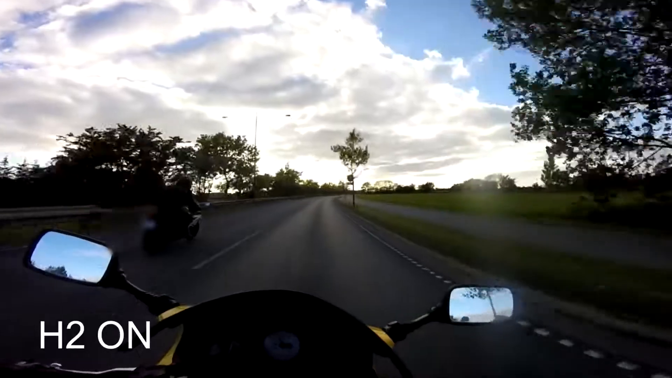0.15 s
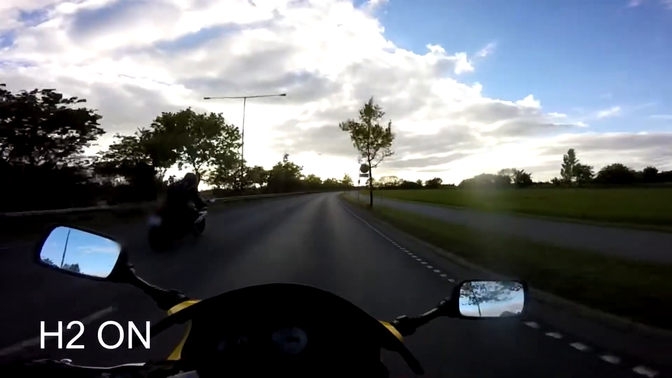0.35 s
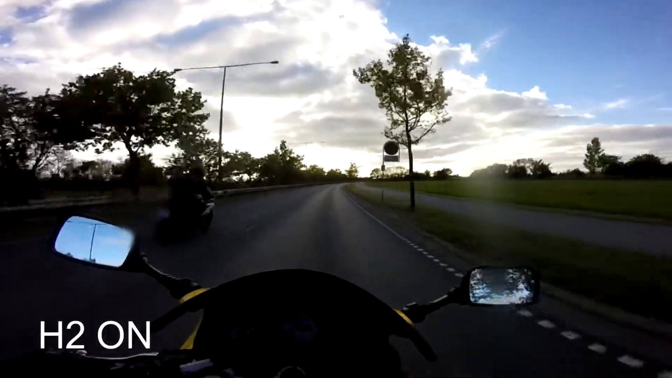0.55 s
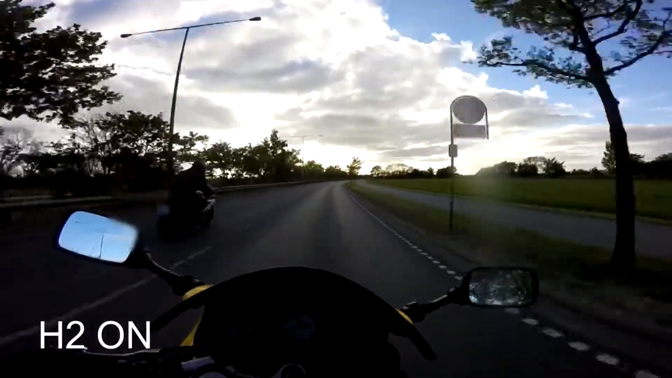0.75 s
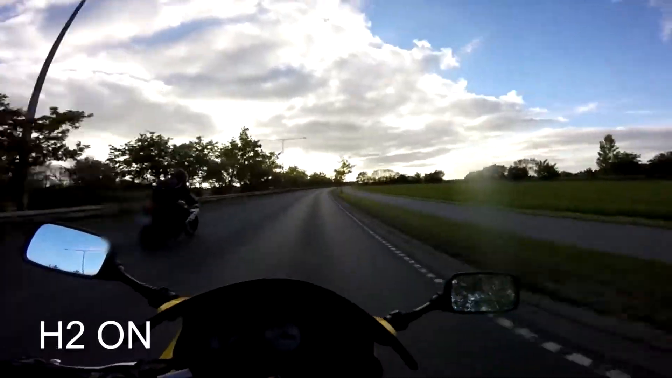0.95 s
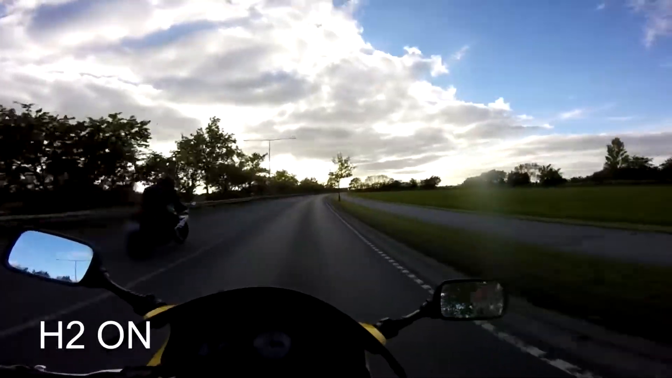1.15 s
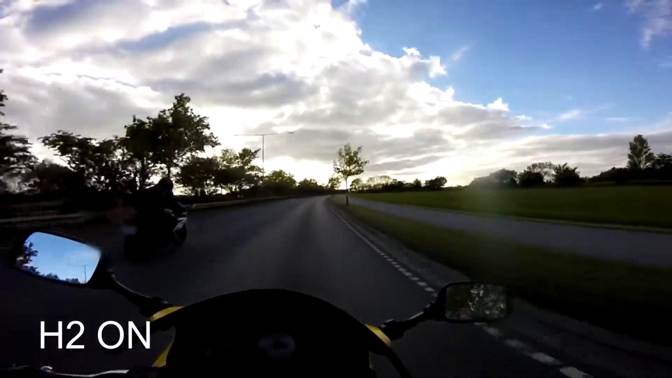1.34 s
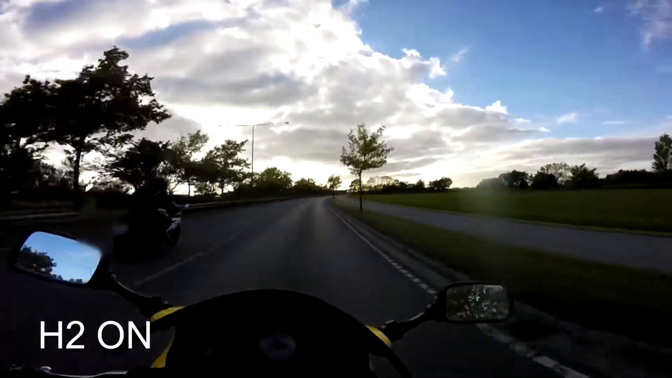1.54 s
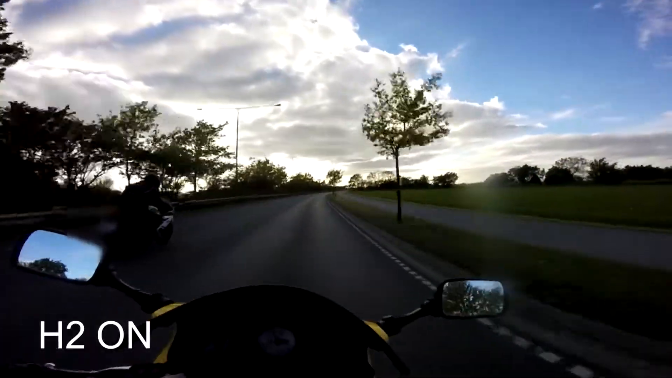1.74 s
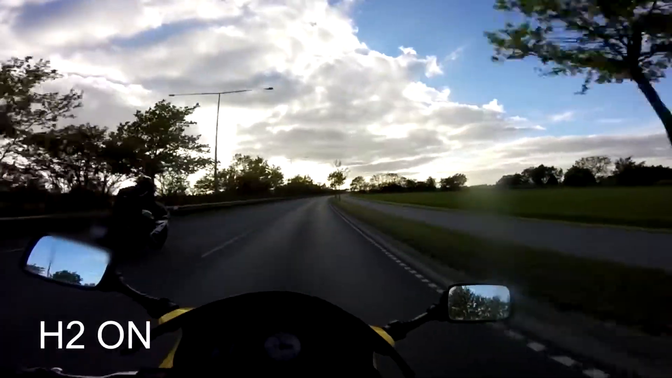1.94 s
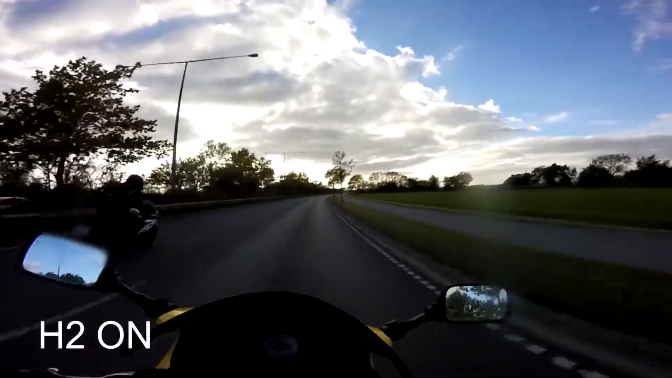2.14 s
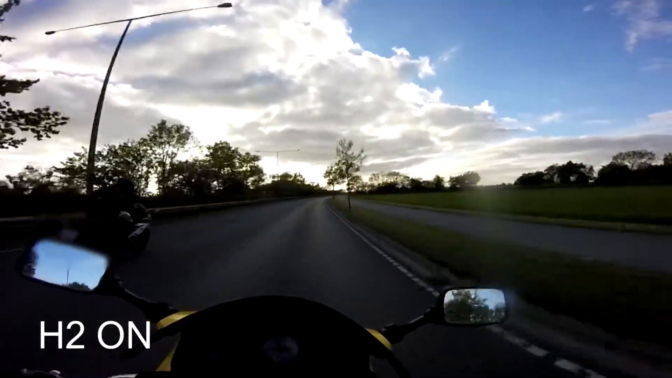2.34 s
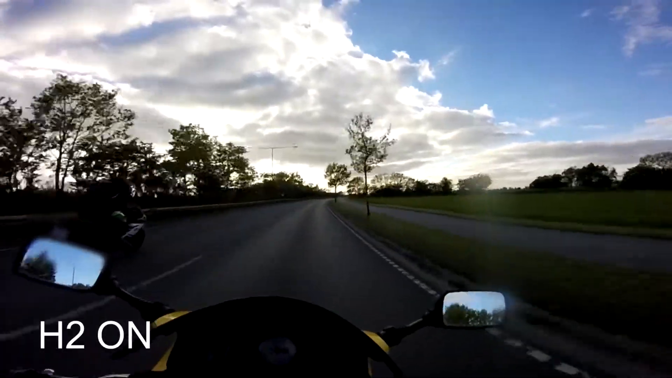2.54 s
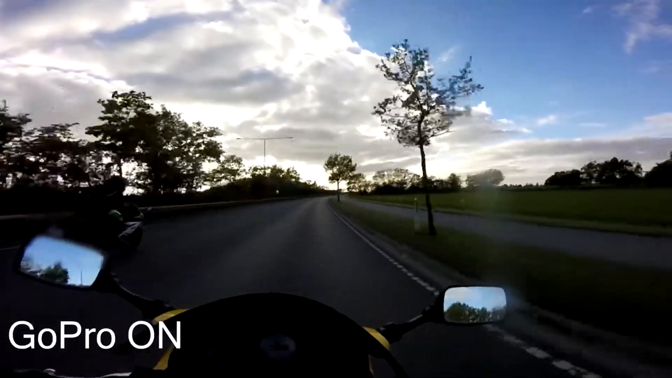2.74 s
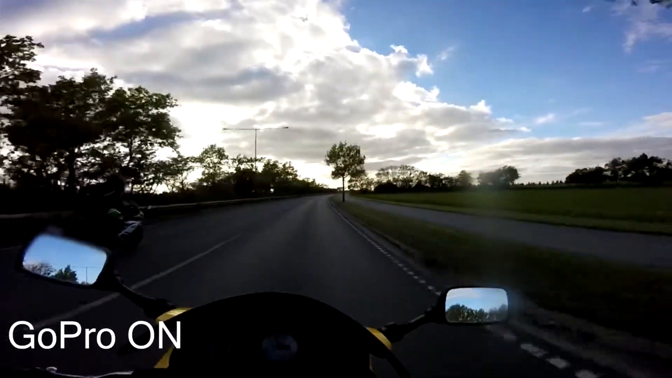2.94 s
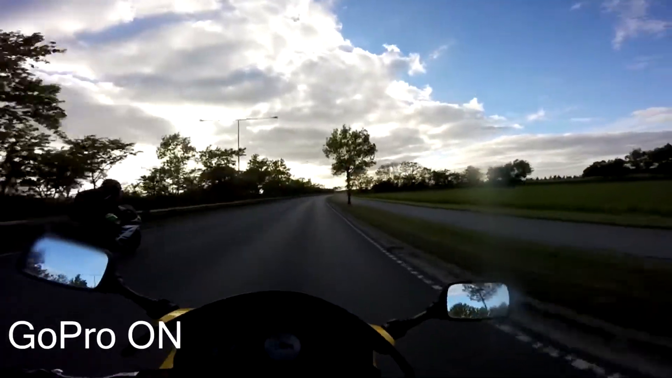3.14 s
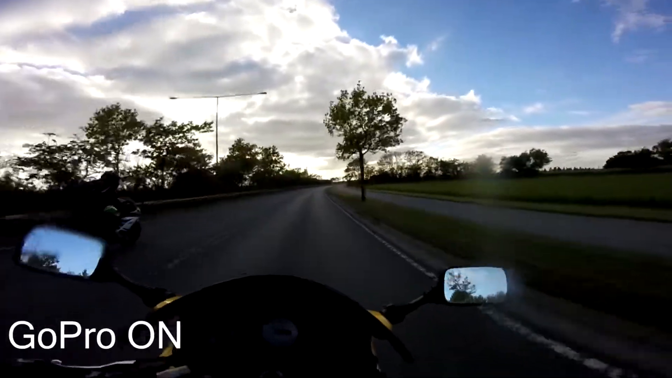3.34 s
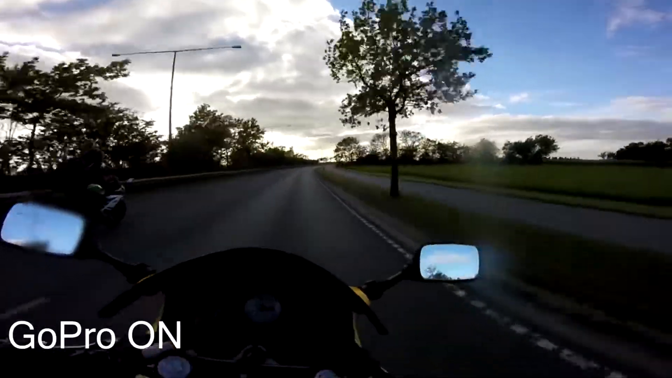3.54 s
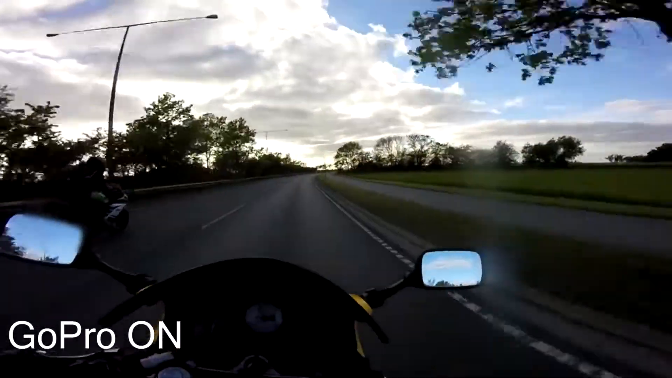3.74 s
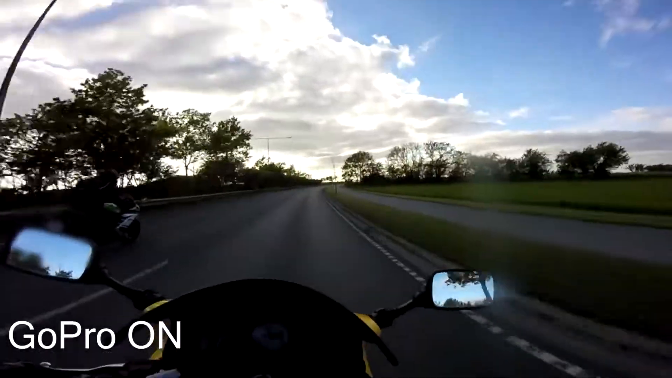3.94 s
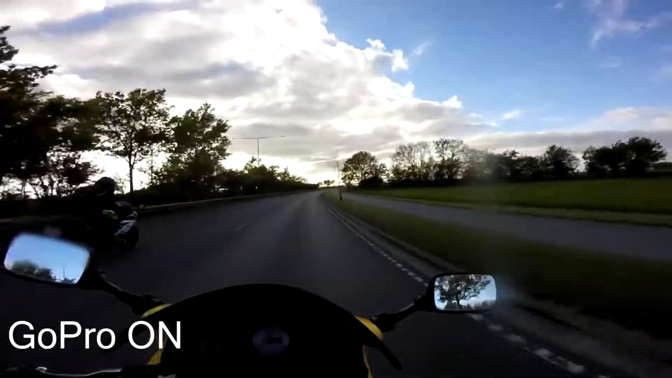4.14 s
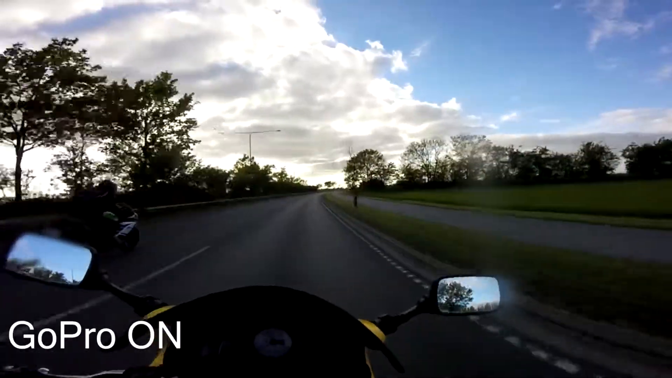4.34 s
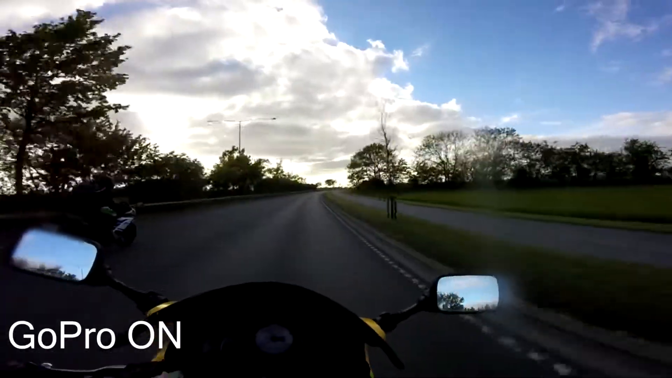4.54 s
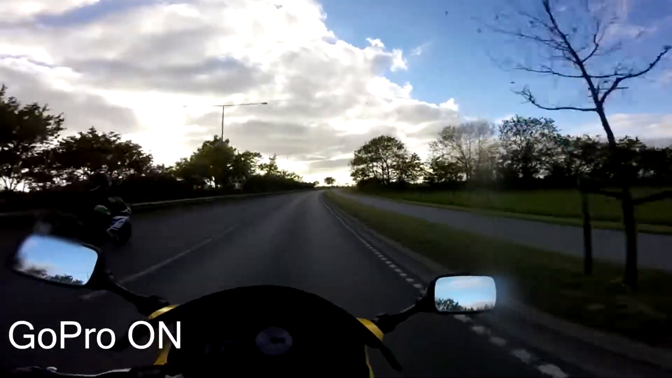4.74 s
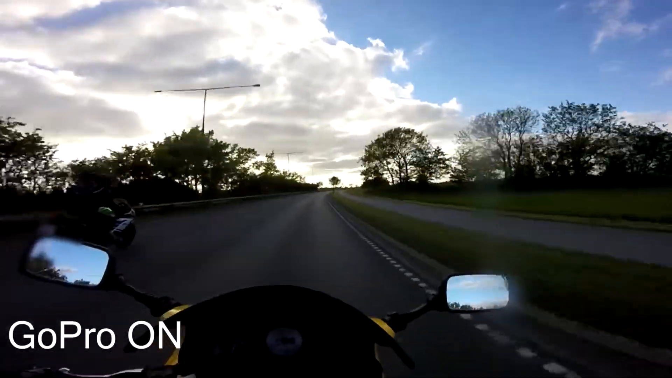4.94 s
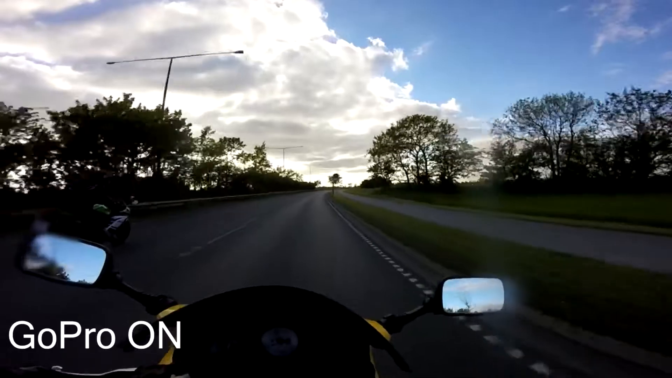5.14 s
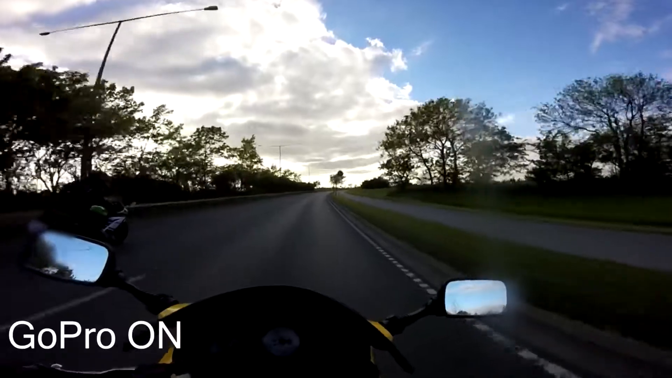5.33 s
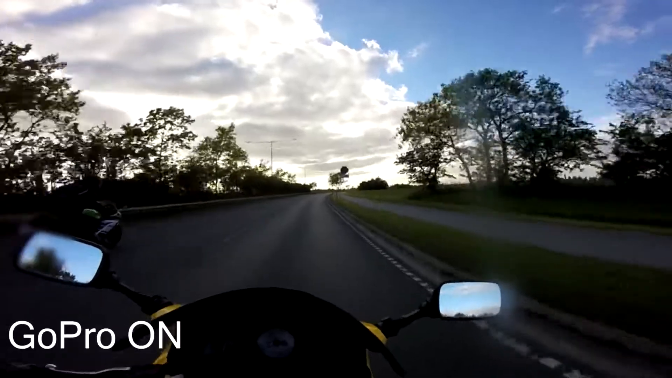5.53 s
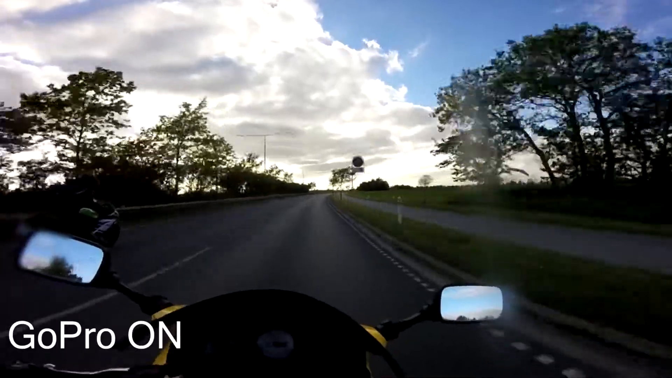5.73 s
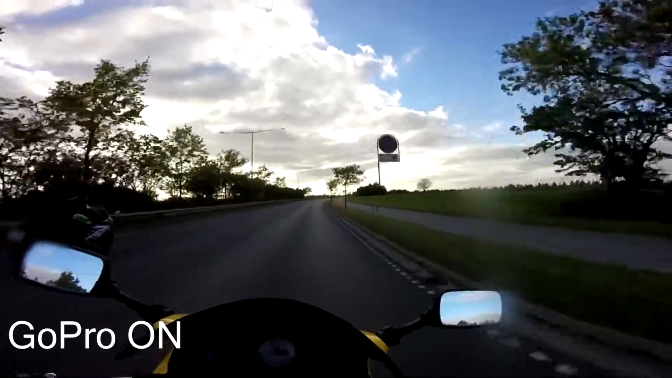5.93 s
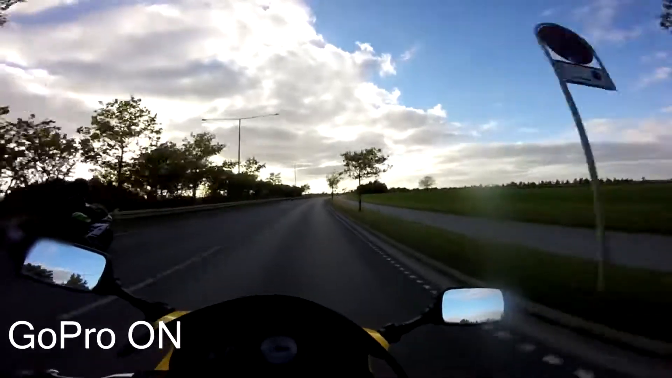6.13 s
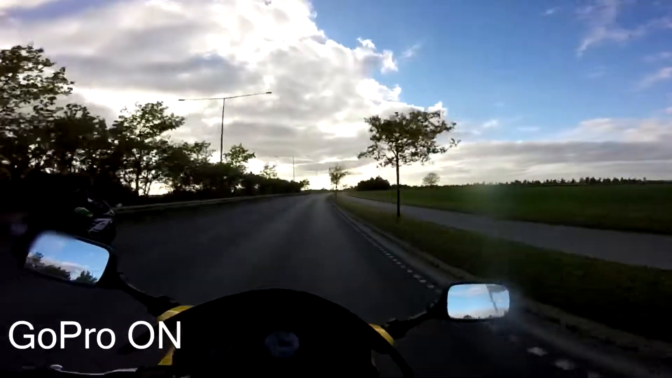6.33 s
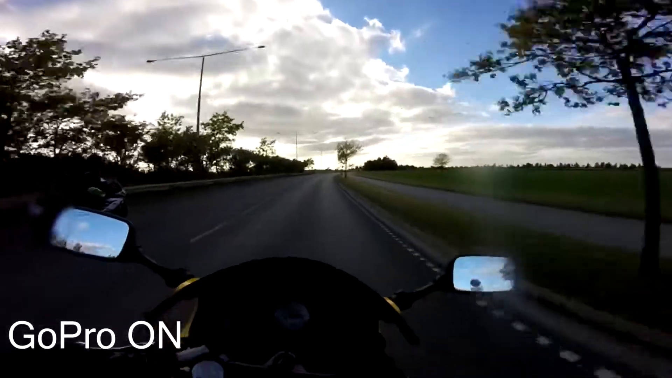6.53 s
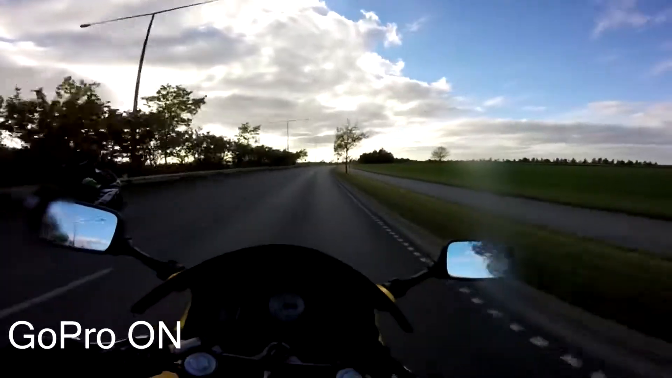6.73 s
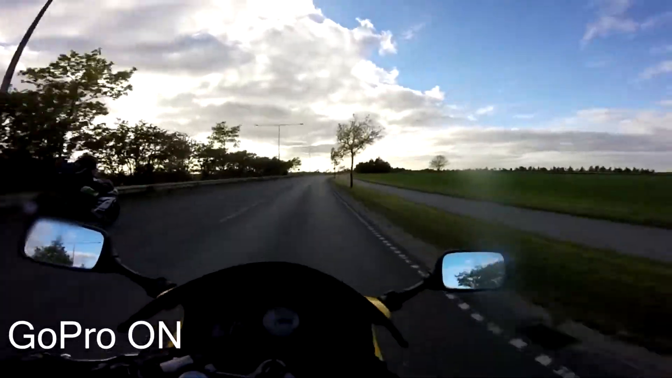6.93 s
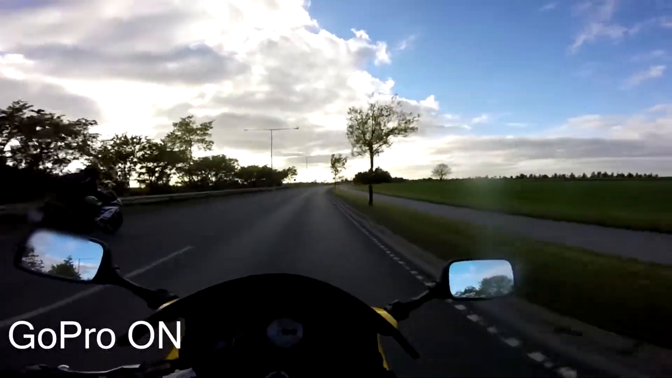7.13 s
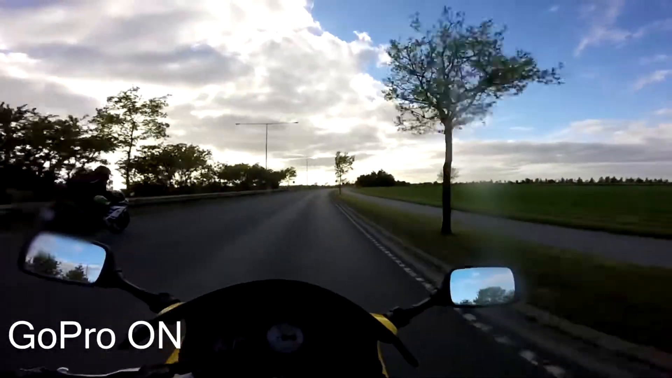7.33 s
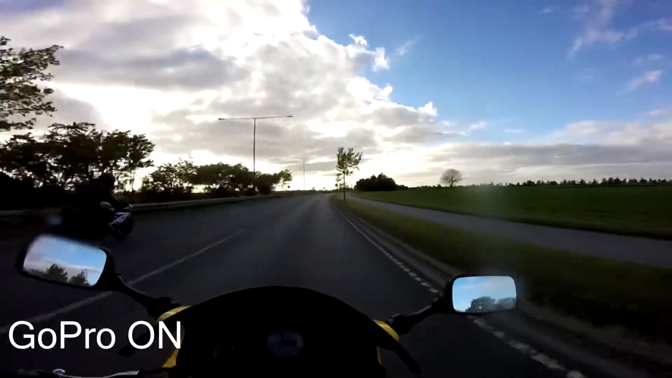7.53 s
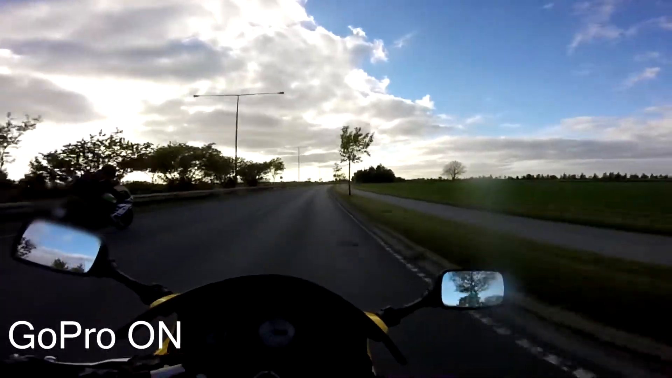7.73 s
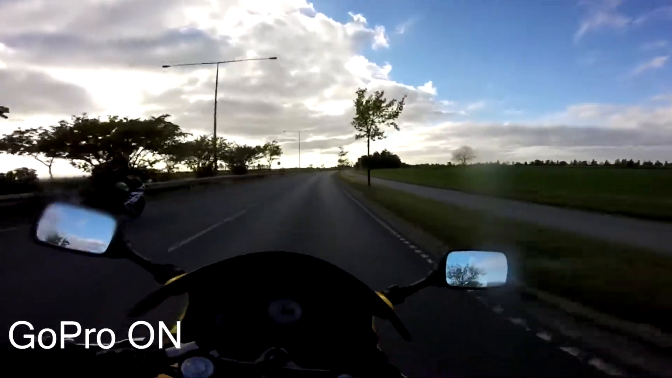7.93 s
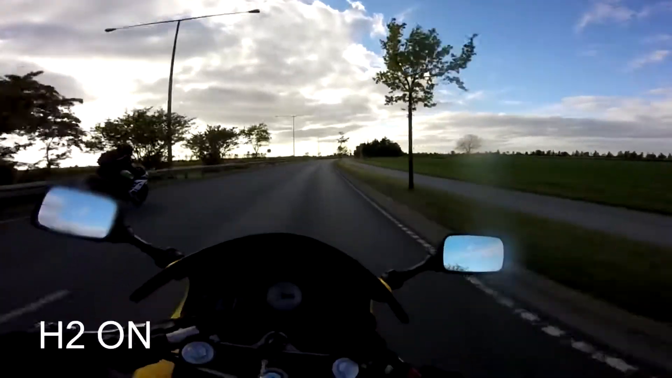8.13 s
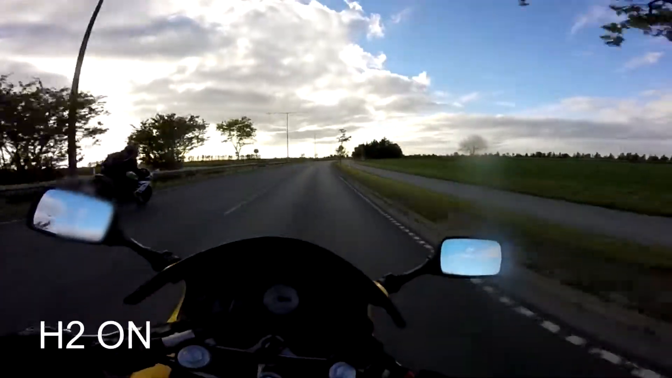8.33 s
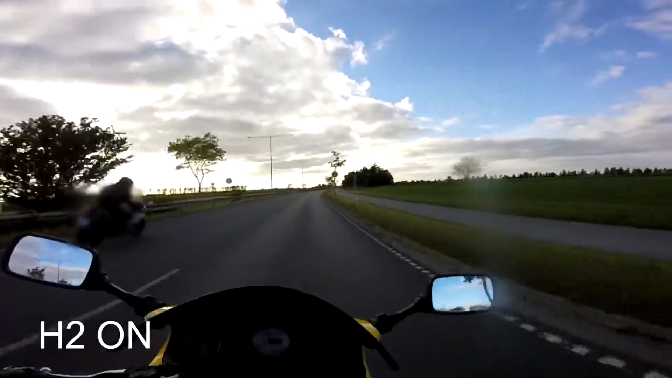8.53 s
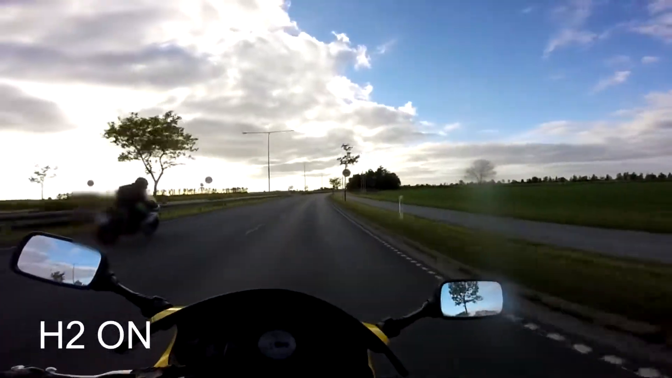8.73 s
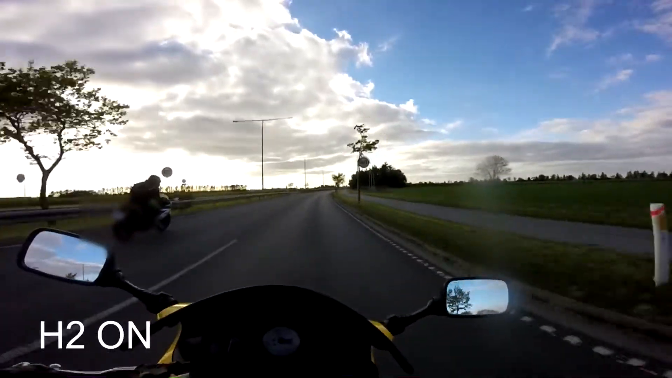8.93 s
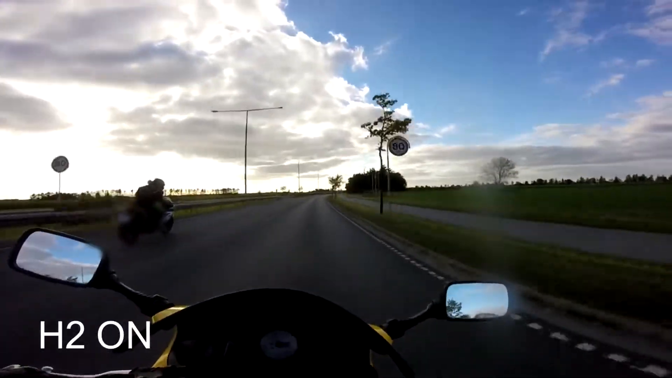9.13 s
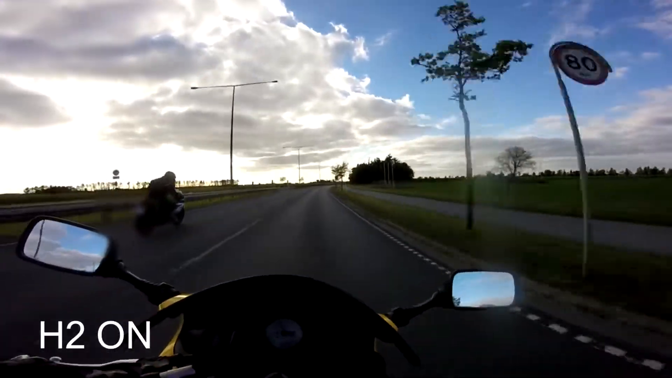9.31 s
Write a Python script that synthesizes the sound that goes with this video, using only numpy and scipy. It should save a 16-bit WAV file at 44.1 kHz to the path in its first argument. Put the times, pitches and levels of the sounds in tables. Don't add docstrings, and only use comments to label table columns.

```python
import sys
import numpy as np
from scipy import signal
from scipy.fft import rfft, irfft, next_fast_len
from scipy.io import wavfile
from scipy.ndimage import uniform_filter1d

SR = 44100
rng = np.random.default_rng(int(sys.argv[2]) if len(sys.argv) > 2 else 0)


def store_wav(level_fs):
    pcm = np.round(np.clip(np.atleast_2d(level_fs), -1, 1) * 32767)
    wavfile.write(sys.argv[1], SR, pcm.T.astype(np.int16))


def undo_db(level):
    steps = np.asarray(level, float) / 20
    return 10 ** steps


N = 417627
TIME = np.arange(N) / SR
SIZE = next_fast_len(N)
FREQ = np.arange(SIZE // 2 + 1) * SR / SIZE + 1e-3

# time in seconds, signed peak re full scale, width in ms,
# gain duck in dB.
BUFFETS = [(2.734, -0.81, 2.3, 7), (2.892, 0.43, 1.5, 4), (2.965, -0.64, 1.6, 6), (3.105, -1.2, 1.8, 14.5),
           (3.265, 1, 1.6, 8.5), (3.426, 0.65, 0.96, 6.6), (3.544, 1, 1.66, 13.5), (3.702, -0.87, 1.7, 7.9),
           (4.095, 0.96, 2.7, 13.5), (4.225, -0.67, 1.8, 11.5), (4.447, -0.5, 1.4, 5.5),
           (4.518, -1.2, 1.4, 10), (4.64, -0.85, 1.6, 12.5), (4.833, -0.9, 0.69, 8.5), (4.963, 0.73, 1, 9),
           (5.141, -0.95, 1.36, 7), (5.695, 0.81, 1.75, 1.7), (5.793, -1.1, 1.4, 5),
           (6.107, -0.73, 1.8, 2.8), (6.252, 0.91, 1.2, 4.5), (6.311, 0.6, 3.48, 9),
           (6.474, -0.91, 1.5, 11), (6.595, -0.68, 1.4, 8.5), (6.648, 0.94, 1.6, 12),
           (6.895, 0.64, 1.5, 11), (7.159, 0.75, 1.5, 4.5), (7.344, 1, 1.75, 8), (7.532, 0.55, 1.4, 4.5),
           (7.765, -0.81, 1.05, 8), (7.986, 0.74, 2.17, 3.5)]


def level(x, db):
    return x * undo_db(db) / np.sqrt(np.mean(x ** 2))


def curves(*tables):
    s, *columns = np.transpose(np.concatenate(tables))
    return [np.interp(TIME, s, column) for column in columns]


def walk(rate):
    hold = int(SR / rate)
    steps = np.repeat(rng.standard_normal(N // 100), hold)[:N]
    return uniform_filter1d(uniform_filter1d(steps, hold), hold)


def bumps(events, width_s):
    coarse = TIME[::64]
    total = sum(db * np.exp(-((coarse - s) / width_s) ** 2 / 2) for s, db in events)
    return total.repeat(64)[:N]


def noise(shape, shared_db, own_db, rate):
    hz, db = np.transpose(shape)
    colour = undo_db(np.interp(np.log(FREQ), np.log(hz), db, left=-80))
    spectrum = rfft(rng.standard_normal(SIZE)) * colour
    octave = np.log2(np.maximum(FREQ, 32) / 32)
    swell = walk(rate)
    total = 0
    for k in range(10):
        band = np.cos(np.pi / 2 * np.clip(octave - k, -1, 1)) ** 2
        gain = undo_db(shared_db * swell + own_db * walk(rate))
        total = total + gain * irfft(spectrum * band, SIZE)[:N]
    return level(total, 0)


def shaped(x, shape):
    hz, db = np.transpose(shape)
    log_gain = np.log(undo_db(np.interp(np.log(FREQ), np.log(hz), db)))
    cepstrum = irfft(log_gain, SIZE)
    cepstrum[1:SIZE // 2] *= 2
    cepstrum[SIZE // 2 + 1:] = 0
    response = np.exp(rfft(cepstrum))
    return level(irfft(rfft(x, SIZE) * response, SIZE)[:N], 0)


def road_noise():
    # frequency in Hz, level in dB per Hz.
    road_colour = [(200, -16), (500, -9.5), (1000, -17), (2000, -22.5), (3600, -31), (4200, -33),
                   (5800, -36), (7000, -42.5), (10000, -46.5), (16000, -62.5)]
    separate = np.array([noise(road_colour, 1.2, 1.4, 3.9) for _ in range(2)])
    shared = noise(road_colour, 1.5, 1.3, 2.8)
    return undo_db(-33.5) * (separate + 0.67 * shared)


def rustle():
    # frequency in Hz, level in dB per Hz.
    rustle_colour = [(3000, -16.5), (7000, -2), (10000, -1), (14000, 1), (14800, 3.5), (16000, -3.5)]
    # time in seconds, peak in dB.
    grit_ticks = [(0.329, -54), (1.2607, -45.5), (1.3594, -50.5), (1.3992, -51.5), (1.469, -47),
                  (1.499, -46.5), (1.7088, -49.5), (1.8786, -46.5), (8.6194, -53.5), (9.3094, -47)]
    rub = undo_db(-59) * np.array([noise(rustle_colour, 2.5, 1.5, 60) for _ in range(2)])
    for s, db in grit_ticks:
        rub = rub * (1 + undo_db(db + 54) * np.exp(-np.abs(TIME - s) / .003))
    return rub


def port_wind():
    # time in seconds, left in dB, right in dB.
    gusts = [
        [(0.0, -4, -3.5), (2.64, -6.5, -3)],
        [(8.16, -5.5, -6.5), (9.47, -5, -2.5)],
    ]
    # frequency in Hz, level in dB per Hz.
    port_colour = [(8, -14.5), (30, -4), (70, 5), (130, -6.5), (250, -16.5), (500, -29), (1000, -32),
                   (2500, -50.5), (16000, -110)]
    return np.array([undo_db(db) * noise(port_colour, 1.1, 1.8, 14) for db in curves(*gusts)])


def helmet_gain():
    # time in seconds, level of the steady hiss in dB.
    rest_gain = [(2.66, -45.5), (3.08, -37.5), (3.5, -44), (3.93, -47), (4.3, -41.5), (4.5, -41.5),
                 (4.82, -45.5), (4.95, -43.5), (5.13, -45.5), (5.45, -50.5), (5.75, -47.5), (6.04, -50),
                 (6.42, -39.5), (6.82, -48.5), (7.14, -43), (7.35, -46), (7.72, -44.5), (8.15, -47.5)]
    recover_s, duck_s = 0.17, 0.01
    s, _, _, duck_db = np.transpose(BUFFETS)
    last = np.maximum(np.searchsorted(s, TIME) - 1, 0)
    below_db = duck_db[last] * np.exp(-np.abs(TIME - s[last]) / recover_s) * (TIME > s[0])
    flutter_db = .7 * walk(45)
    return curves(rest_gain)[0] - uniform_filter1d(below_db, int(duck_s * SR)) + flutter_db


def helmet_wind(gain_db):
    # frequency in Hz, level in dB per Hz.
    helmet_colour = [(12, -35), (25, -3.5), (50, -2), (90, 0), (250, -6), (400, -12), (620, -17),
                     (900, -27.5), (1250, -40), (2500, -46.5), (16000, -120)]
    # time in seconds, rise in dB.
    flurries = [(2.82, 1.5), (2.893, 3.5), (2.975, 5), (3.263, 2), (3.42, 6), (3.496, 6.5), (3.6, 8.5),
                (3.87, 3), (4.09, 6), (4.364, 3.5), (4.62, 8.5), (4.75, 6), (4.819, 7.5), (4.971, 3),
                (5.14, 0), (5.272, 7.5), (5.518, 5), (5.683, 6), (5.935, 8.5), (6.107, 0), (6.585, 11),
                (6.701, 12), (6.83, 6.5), (6.972, 6), (7.174, 5.5), (7.345, 8.5), (7.575, 3), (7.77, 8.5),
                (7.95, 6.5), (8.125, 12)]
    # time in seconds, dip in dB.
    lulls = [(2.86, 5), (3.135, 18), (3.295, 10), (3.568, 7), (3.66, 9), (3.76, 5), (4.195, 12), (4.27, 14),
             (4.315, 14), (4.56, 10), (4.72, 6), (4.86, 15), (4.905, 8), (5.19, 7), (5.39, -1), (5.58, 1),
             (5.72, 4), (6.34, 10), (6.5, 6), (6.92, 9), (7.12, 2), (7.4, 3), (7.45, -3.5), (8.005, 4)]
    # swing from the usual -47 dB gain, flurry, lull
    large_follows, small_follows = (0.19, 0.31, 0.73), (0.48, 0.69, 0.38)
    moves = np.array([gain_db + 47, bumps(flurries, 0.021), -bumps(lulls, 0.013)])
    large_db = -14 + np.dot(large_follows, moves)
    small_db = -25.5 + np.dot(small_follows, moves)
    lumps_db = 3 * walk(160)

    air = noise(helmet_colour, 2.4, 1.2, 90)
    large = signal.sosfiltfilt(signal.butter(2, 330, fs=SR, output="sos"), air)
    small = air - large
    return undo_db(large_db) * level(large, -1.57) + undo_db(small_db + lumps_db) * level(small, -1.23)


def add_buffets(wind):
    for s, peak, ms, _ in BUFFETS:
        near = slice(int((s - .015) * SR), int((s + 0.022) * SR))
        u = (TIME[near] - s) / (ms * 0.00056)
        bump = np.exp(-u ** 2 / 2)
        rebound = 0.091 * np.exp(-u ** 2 / 30)
        wind[near] = wind[near] * (1 - bump) + peak * (1.16 * bump - rebound)
    return wind


def housing_hiss(puff):
    # frequency in Hz, level in dB per Hz.
    housing_colour = [(800, -3.5), (1800, 8.5), (2300, 0), (2700, -7), (3600, 1), (4050, -9.5), (4600, -4),
                      (6400, -4), (7100, -10.5), (8000, -7), (9300, -16), (13000, -24), (14900, -43),
                      (15100, -75)]
    whistle_hz, whistle_db, whistle_at_s, whistle_s = 5830, -14, 7.82, .3
    hiss = undo_db(2.5) * noise(housing_colour, .6, .6, 10) * (1 + .7 * puff)
    swell = undo_db(whistle_db + 4 * walk(25)) * np.exp(-((TIME - whistle_at_s) / whistle_s) ** 4)
    return hiss + swell * np.sin(2 * np.pi * whistle_hz * TIME + 1.5 * walk(40))


def exhaust_cracks():
    # time in seconds, crack rate in Hz.
    crack_rate = [(0.0, 67.59), (0.75, 67.87), (1.45, 67.31), (1.99, 67.76), (2.45, 68.3), (2.99, 68.59),
                  (3.49, 68.96), (3.78, 68.86), (4.3, 68.04), (4.88, 68.43), (5.23, 68.3), (5.75, 67.92),
                  (6.23, 68.23), (7.48, 69.03), (8.22, 70.02), (8.5, 70.19), (9.0, 70.12), (9.47, 70.45)]
    # time in seconds, round trip in ms.
    pipe_trip = [(0, 3.09), (1.05, 3.08), (1.5, 3.15), (2.1, 3.14), (2.8, 3.01), (3.75, 3.0), (4.25, 3.07),
                 (4.75, 3.01), (5.6, 3.09), (6.6, 3.09), (7.1, 3.04), (8.0, 2.98), (9.47, 3.0)]
    pipe_echo_db = [-3, -12, -15]
    turns = np.cumsum(curves(crack_rate)[0]) / SR
    time_chance, level_chance = rng.standard_normal((N // 100, 2))[:int(turns[-1]) - 1].T
    at = np.interp(np.arange(len(time_chance)) + .74, turns, TIME) + 1.5e-5 * time_chance
    trip_s = np.interp(at, *np.transpose(pipe_trip)) / 1000
    cracks = np.zeros(N + SR)
    for k, db in enumerate([0, *pipe_echo_db]):
        place = (at + k * trip_s) * SR
        size = undo_db(db + 1.2 * level_chance)
        whole = place.astype(int)
        np.add.at(cracks, whole, size * (whole + 1 - place))
        np.add.at(cracks, whole + 1, size * (place - whole))
    return cracks[:N]


def neighbour():
    # frequency in Hz, level in dB.
    near_colour = [(200, -5), (270, 25), (340, 22), (430, 4.5), (650, 6), (900, 4.5), (1100, -9.5),
                   (1330, 4.5), (1630, 3), (1950, -2), (2400, -13), (3000, -19.5), (3550, -11.5),
                   (3900, -26.5), (8000, -50)]
    # frequency in Hz, level in dB.
    far_colour = [(250, -19), (340, 9), (700, 3.5), (1100, -28), (1350, -1.5), (1650, -1), (1980, 0),
                  (2300, -8), (2600, -22), (3000, -18), (3550, -24.5), (4200, -22), (8000, -47)]
    # time in seconds, rasp in dB, extra deep ring in dB (heard from
    nearness = [(0, -1, 0.5), (.8, 1, -0.5), (1.2, -3, 0.5), (1.7, 1.5, 1.5), (2.2, 2, 3), (2.6, 1.5, 4.5),
                (3.1, 2.5, -1), (3.6, 0, 0.5), (4.2, -3, 1), (4.7, 0.5, 2), (5.3, -2, -2), (5.8, 1.5, -1),
                (6.3, 3, -2.5), (6.7, 1.5, -6), (7.2, 5, -6), (7.9, 3, -5.5), (8.5, 1.5, -6), (9.47, 0, -7)]
    rasp_db, deep_db = curves(nearness)
    cracks = exhaust_cracks()
    puff = uniform_filter1d(cracks, 60)
    heard = np.array([shaped(cracks, colour) for colour in (near_colour, far_colour)])
    hum = signal.sosfiltfilt(signal.butter(2, 500, fs=SR, output="sos"), heard)
    deep_band = signal.butter(2, (1150, 1490), "bandpass", fs=SR, output="sos")
    deep = signal.sosfiltfilt(deep_band, heard)
    rasp = heard - hum + (undo_db(deep_db) - 1) * deep
    near, far = hum + undo_db(rasp_db) * rasp
    return near, far, puff / puff.max()


def engine():
    # time in seconds, cycle rate in Hz, level in dB.
    engine_run = [
        [(0.0, 44.3, -9), (0.47, 44.6, -8.5), (1.88, 45.3, -9.5), (2.28, 45.16, -10.5), (2.64, 45.06, -16)],
        [(8.16, 44.56, -11.5), (8.3, 44.6, -9), (8.6, 44.55, -11.5), (9.2, 44.41, -9), (9.47, 44.3, -5.5)],
    ]
    # multiple of the cycle rate, level in dB.
    engine_orders = [(1, -9), (2, -2), (3, 0.5), (4, -15.5), (5, -5.5), (6, -1.5), (7, -4), (8, 3), (9, -7),
                     (10, -9), (11, -13), (12, -19), (13, -20.5), (14, -16), (15, -23), (16, -16)]
    hz, db = curves(*engine_run)
    phase = 2 * np.pi * np.cumsum(hz) / SR
    total = 0
    for k, order_db in engine_orders:
        wander = 0.4 * walk(12) + 2 * np.pi * rng.random()
        total = total + undo_db(order_db + 2.8 * walk(7)) * np.sin(k * phase + wander)
    return level(total, 0) * undo_db(db)


def microphone_pair(motor, other):
    offset, rail, knee, converter_hz = .07, .795, 14, 9000
    motor_tilt = undo_db(np.array([[1.1], [-1.1]]))
    other_tilt = undo_db(np.array([[1.6], [-1.6]]))
    motors = motor * motor_tilt + undo_db(-18) * other * other_tilt
    x = (port_wind() + road_noise() + rustle() + motors + offset) / rail
    clipped = rail * x / (1 + np.abs(x) ** knee) ** (1 / knee)
    return signal.lfilter(*signal.butter(1, converter_hz, fs=SR), clipped)


def helmet_microphone(motor, other, puff):
    gain_db = helmet_gain()
    wind = add_buffets(helmet_wind(gain_db))
    x = wind + undo_db(gain_db) * (housing_hiss(puff) + undo_db(13) * other + undo_db(33) * motor)
    top_cut = signal.ellip(8, .2, 60, 14950, fs=SR, output="sos")
    return signal.sosfilt(top_cut, np.tanh(x / 1.3) * 1.3)


def scene():
    cuts_s, fades_s = (2.648, 8.154), (.002, .006)
    motor = engine()
    other_near, other_far, puff = neighbour()
    inside = np.minimum((TIME - cuts_s[0]) / fades_s[0], (cuts_s[1] - TIME) / fades_s[1])
    pair = microphone_pair(motor, other_near)
    helmet = helmet_microphone(motor, other_far, puff)
    return pair * np.clip(-inside, 0, 1) + helmet * np.clip(inside, 0, 1)


def low_pass(x):
    return signal.sosfilt(signal.butter(12, 15750, fs=SR, output="sos"), x)


def record(dry):
    return low_pass(dry)


dry = scene()
out = record(dry)
store_wav(out)
```